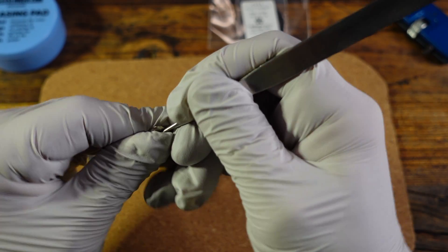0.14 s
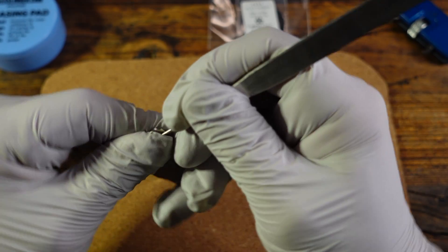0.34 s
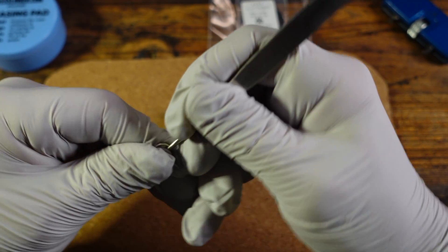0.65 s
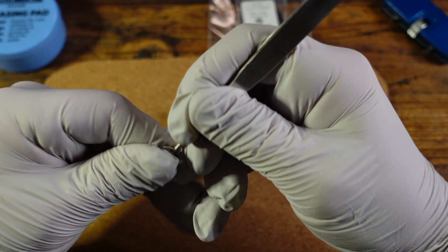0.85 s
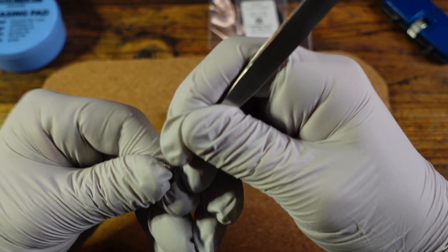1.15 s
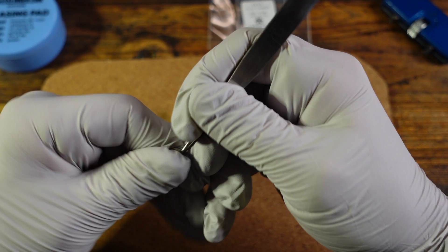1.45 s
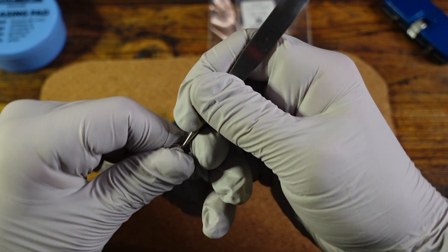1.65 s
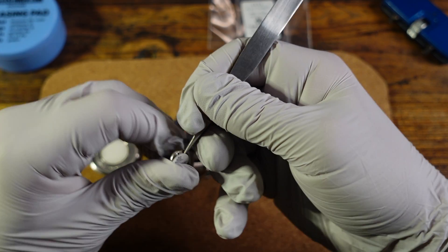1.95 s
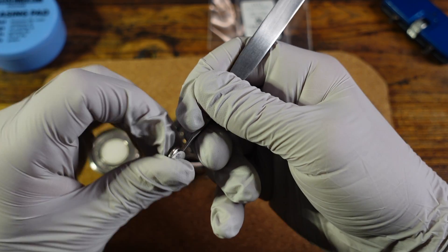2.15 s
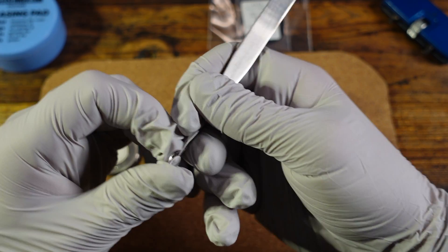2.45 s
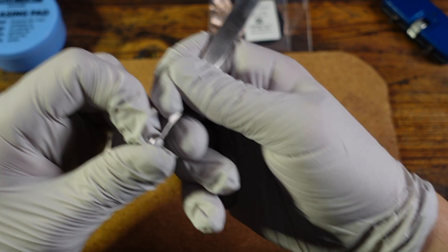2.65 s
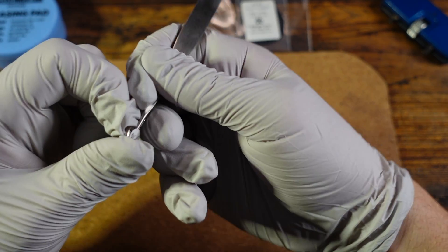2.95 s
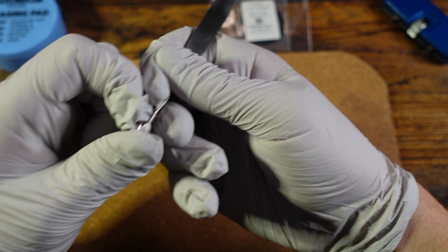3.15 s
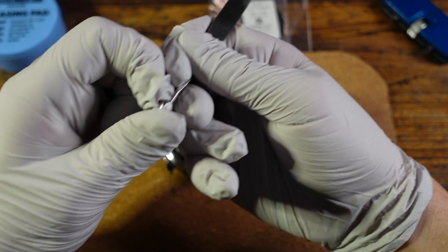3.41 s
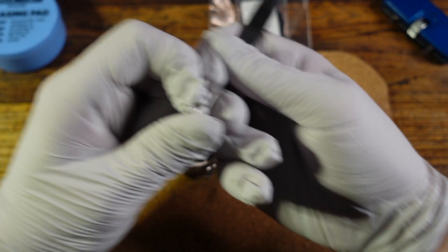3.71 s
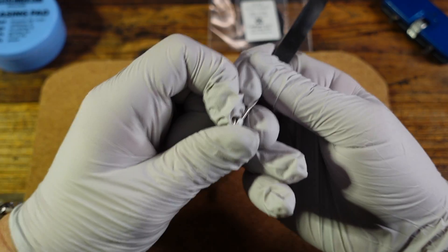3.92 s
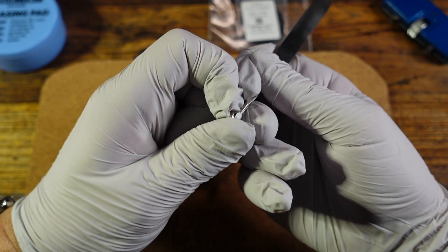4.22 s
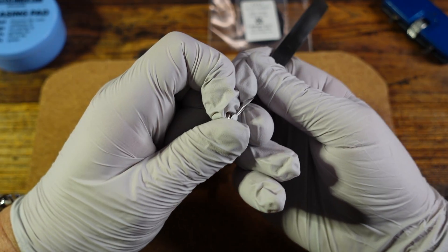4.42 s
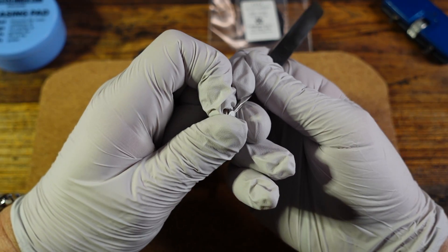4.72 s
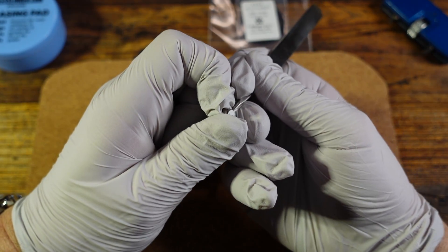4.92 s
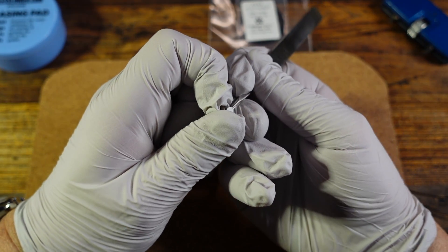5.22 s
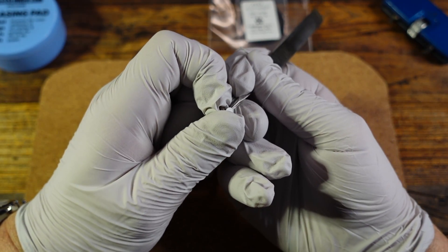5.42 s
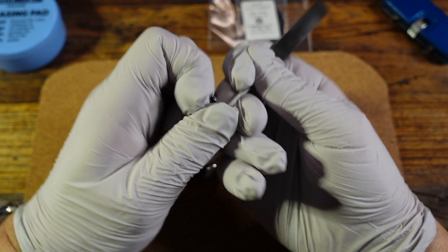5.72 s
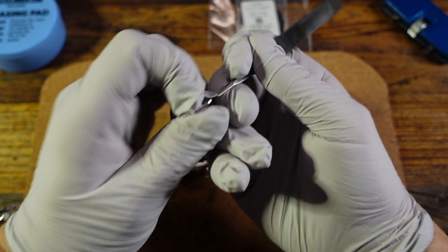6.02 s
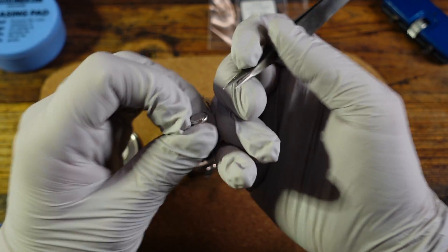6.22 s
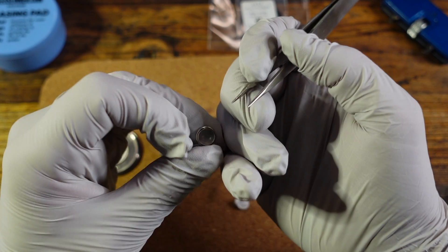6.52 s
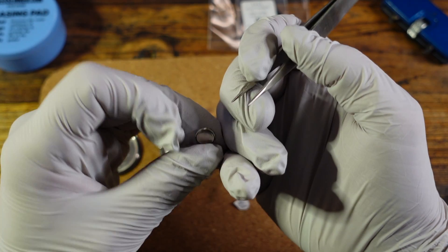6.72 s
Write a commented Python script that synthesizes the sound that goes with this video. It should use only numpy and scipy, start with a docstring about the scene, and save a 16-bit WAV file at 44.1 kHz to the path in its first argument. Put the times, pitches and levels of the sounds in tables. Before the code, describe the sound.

Steel tweezers tick and scrape against a tiny battery cell, then pop it free, with soft rubber glove rubs over a faint fan hum.

```python
"""Small steel ticks and scrapes, close to a mono microphone: tweezers pry a button cell from under its tab.
Each contact rings the steel and the metal tab and knocks the holder; the tip slips off with a snap,
and later the cell pops free with a thump and slides out. Rubber gloves rub, creak and snap as they unstick.
A few dull knocks arrive from farther off in the small room, over a faint fan hum."""
import sys
import numpy as np
from scipy import signal
from scipy.fft import rfft, irfft, next_fast_len
from scipy.io import wavfile

SR = 44100
rng = np.random.default_rng(int(sys.argv[2]) if len(sys.argv) > 2 else 0)


def pcm_store(signal):
    """Save signal as 16-bit PCM."""
    levels = np.round(np.clip(np.atleast_2d(signal), -1, 1) * 32767)
    wavfile.write(sys.argv[1], SR, levels.astype(np.int16).T)


N = 302460
TIME = np.arange(N) / SR
AGE = np.arange(SR * 2 // 5) / SR  # seconds since a blow


def amp(db):
    """Decibels to gain."""
    return np.exp(np.asarray(db) * np.log(10) / 20)


def unit(x):
    """Scale to rms 1."""
    return x / np.sqrt(np.mean(x ** 2) + 1e-20)


def struck(x):
    """Scale to rms 1 over the first 4 ms."""
    return x / np.sqrt(np.mean(x[:SR // 250] ** 2) + 1e-20)


def along(points, hz):
    """Read (freq_hz, value) points on a log frequency axis."""
    freqs, values = np.transpose(points)
    return np.interp(np.log(hz + 1), np.log(freqs + 1), values)


def add(track, start_s, x):
    """Mix x into the track at start_s."""
    part = track[round(start_s * SR):][:len(x)]
    part += x[:len(part)]


def filtered(x, response):
    """Pass x through a frequency response."""
    size = next_fast_len(len(x) + 8192)
    return irfft(rfft(x, size) * response(np.fft.rfftfreq(size, 1 / SR)), size)[:len(x)]


def coloured(x, spectrum):
    """Shape x by (freq_hz, gain_db) points, at rms 1."""
    return unit(filtered(x, lambda hz: amp(along(spectrum, hz))))


def friction(spectrum, slips_per_s, grit):
    """Tiny random slips over a smooth rush."""
    slips = (rng.random(N) < slips_per_s / SR) * rng.standard_normal(N)
    return coloured(rng.standard_normal(N) + grit * unit(slips), spectrum)


def swell(start_s, rise_s, fade_s, hold_s=0):
    """Gain of one movement: it gathers speed, keeps it for hold_s and dies away."""
    age = TIME[:round((rise_s + hold_s + 10 * fade_s) * SR)]
    rise = np.sin(np.pi / 2 * np.minimum(age / rise_s, 1)) ** 2
    fade = np.exp(-np.maximum(age - rise_s - hold_s, 0) / fade_s)
    gain = np.zeros(N)
    add(gain, start_s, rise * fade)
    return gain


def together(gains):
    """Overlapping movements add in power."""
    return np.sqrt(sum(gain ** 2 for gain in gains))


def ring(modes, scatter_db):
    """Damped modes of alternating sign, at new strengths for each blow."""
    hz, db, t60 = np.transpose(modes)[:, :, None]
    sign = (-1) ** np.arange(len(hz))[:, None]
    age = AGE[AGE < 2 * t60.max()]
    fade = amp(db + scatter_db * rng.standard_normal(hz.shape) - 60 * age / t60)
    ringing = np.sum(sign * fade * np.sin(2 * np.pi * hz * age), axis=0)
    return struck(np.pad(ringing, (0, len(AGE) - len(age))))


def favouring(modes, centre_hz, db_per_octave):
    """The point and firmness of a contact favour the modes near one frequency."""
    return [(hz, db - db_per_octave * abs(np.log2(hz / centre_hz)), *rest) for hz, db, *rest in modes]


# Room tone at the microphone: freq_hz, gain_db
ROOM_TONE = [(10, -13), (20, 1), (30, -10.5), (58, -12.5), (95, -14), (150, -13), (330, -14.5),
             (490, -22.5), (780, -19.5), (1100, -25), (3200, -28.5), (7700, -29.5), (14200, -31.5),
             (16000, -37)]
# A fan, faint in the room: pitch_hz, width_hz, level_db
FAN_BANDS = [(134.5, 5, -76), (153, 8, -71.5), (178, 5, -81), (802, 30, -80)]
def background():
    """Steady room noise and microphone hiss; narrow bands of noise make the fan's wavering hum."""
    air = amp(-63) * coloured(rng.standard_normal(N), ROOM_TONE)
    for centre, width, db in FAN_BANDS:
        hum = filtered(rng.standard_normal(N), lambda hz: 1 / (1 + (2 * (hz - centre) / width) ** 2))
        air += amp(db) * unit(hum)
    return air


# Decay of the small room: freq_hz, t60_s
ROOM_DECAY = [(120, 0.72), (400, 0.35), (1500, 0.45), (5000, 0.38), (9000, 0.31), (16000, 0.11)]
def room_tail():
    """Diffuse reverberation of energy 1; the treble dies first."""
    hz, age, bands = signal.stft(rng.standard_normal(len(AGE)), SR, nperseg=256)
    decay = amp(-60 * age / along(ROOM_DECAY, hz)[:, None])
    tail = signal.istft(bands * decay, SR, nperseg=256)[1][:len(AGE)]
    tail *= 1 - np.exp(-AGE / 0.00076)
    return tail / np.linalg.norm(tail)


# Desk and walls around the microphone: delay_s, gain_db
REFLECTIONS = [(.0047, -18), (.0094, -25), (0.0106, -15.5), (0.02, -46)]
def echoed(x):
    """A near sound with its first echoes."""
    return x + sum(amp(db) * np.pad(x, (round(delay * SR), 0))[:len(x)] for delay, db in REFLECTIONS)


def in_room(x, wet_db):
    """A near sound with its early echoes and reverberation."""
    return echoed(x) + amp(wet_db) * signal.fftconvolve(x, room_tail())[:len(x)]


# Resonances of a hollow object, farther off in the room: pitch_hz, width_hz, gain_db
HOLLOW_MODES = [(416, 43, 2), (616, 190, -11), (784, 55, -0.5), (937, 13, 1.5), (1032, 22, 1.5),
                (1136, 26, -3.5), (1315, 67, -3), (1505, 49, -2.5), (1656, 75, -5), (2080, 150, -11),
                (2480, 210, -14), (3430, 1500, -21.5), (6800, 8200, -25.5)]
# Knocks on it: start_s, relative_db
FAR_KNOCKS = [(4.466, -52.5), (4.719, -51), (4.866, -53), (5.069, -60.5), (5.796, -54), (5.804, -51)]
def far_knocks():
    """A hollow object is knocked at a distance, heard through the room's reverberation."""
    def body(hz):
        return sum((-1) ** k * amp(db) * 1j * hz * width / (pitch ** 2 - hz ** 2 + 1j * hz * width)
                   for k, (pitch, width, db) in enumerate(HOLLOW_MODES))
    out = np.zeros(N)
    for start, db in FAR_KNOCKS:
        add(out, start, amp(db - 11) * unit(filtered(room_tail(), body)))
    return out


# Glove on glove, close up: start_s, rise_s, fade_s, level_db, brightness_db
GLOVE_STROKES = [(0.33, 0.24, 0.069, -72, -1.5), (2.46, 0.21, 0.064, -68, 2.5),
                 (2.64, 0.15, 0.14, -65, -2.5), (2.9, 0.057, 0.025, -79, 13), (3.27, 0.17, 0.12, -67, -3.5),
                 (3.66, 0.13, 0.16, -64, 1), (3.76, 0.21, 0.018, -65.5, -10)]
# The rub and the hiss above it: freq_hz, gain_db
RUB_SPECTRUM = [(500, -32), (900, -6.5), (1220, 2.5), (1900, -1.5), (2600, -11), (5000, -36)]
HISS_SPECTRUM = [(1500, -12), (2300, -1), (3100, 1), (4200, -3.5), (6000, -4.5), (9000, -15), (16000, -21)]
def glove_rubs():
    """Rubber slides on rubber, each stroke with its own share of hiss."""
    strokes = [(amp(db) * swell(start, rise, fade), bright_db)
               for start, rise, fade, db, bright_db in GLOVE_STROKES]
    rub = together(stroke for stroke, _ in strokes)
    hiss = together(stroke * amp(bright_db + 1) for stroke, bright_db in strokes)
    return (rub * friction(RUB_SPECTRUM, slips_per_s=900, grit=0.52)
            + hiss * friction(HISS_SPECTRUM, slips_per_s=970, grit=0.59))


# Fingers squeezing, close up: start_s, length_s, flesh_relative_db, creak_relative_db
GRIPS = [(0.3, 0.096, -70, -61.5), (0.41, 0.19, -73, -66.5), (0.85, 0.11, -80, -66),
         (0.906, 0.072, -70, -57.5), (0.99, 0.33, -70, -66), (1.348, 0.11, -75, -61),
         (1.45, 0.17, -76, -64.5), (2.1, 0.45, -67, -72), (2.5, 0.1, -63.5, -71), (2.58, 0.4, -64, -66.5),
         (3.671, 0.25, -64, -66.5), (4.14, 0.19, -72, -70), (5.948, 0.36, -70, -69.5),
         (6.39, 0.11, -64.5, -69)]
# The low rustle of flesh and the glove's creak: freq_hz, gain_db
FLESH_SPECTRUM = [(50, -18.5), (130, -21), (220, 5.5), (320, -10), (500, -24), (1500, -54)]
CREAK_SPECTRUM = [(200, -24), (370, 3), (650, 0.5), (850, -1), (1200, -17), (2000, -32), (5000, -43)]
def finger_squeezes():
    """Gloved fingers rustle and creak in sparse slips as they shift their grip."""
    flesh, creak = together(amp([[flesh_db], [creak_db]]) * swell(start, 0.5 * length, 0.62 * length)
                            for start, length, flesh_db, creak_db in GRIPS)
    return (amp(-1.5) * flesh * friction(FLESH_SPECTRUM, slips_per_s=60, grit=0.36)
            + amp(0.5) * creak * friction(CREAK_SPECTRUM, slips_per_s=120, grit=0.61))


# Gloves unsticking near the microphone: start_s, low_db, high_db
GLOVE_SNAPS = [(6.505, -39, -51.5), (6.5604, -45.5, -44.5), (6.5679, -45, -50), (6.613, -52.5, -51)]
# Low and high modes of the rubber: pitch_hz, gain_db, t60_s
RUBBER_LOW_MODES = [(890, -2, 0.0074), (1430, 0, 0.01), (2060, -2.5, 0.0082)]
RUBBER_HIGH_MODES = [(2930, -1, 0.0056), (3940, 5.5, 0.0027), (6060, -5.5, 0.0027)]
def glove_snaps():
    """Tacky rubber peels off in dry, well damped snaps."""
    out = np.zeros(N)
    for start, low_db, high_db in GLOVE_SNAPS:
        low = amp(low_db) * ring(RUBBER_LOW_MODES, scatter_db=1.0)
        high = amp(high_db) * ring(RUBBER_HIGH_MODES, scatter_db=5.5)
        add(out, start, in_room(low + high, wet_db=-14.0))
    return out


# Modes of the hands and the cell's holder, close up: pitch_hz, gain_db, t60_s
HAND_MODES = [(100, 3.5, 0.093), (251, -2.5, 0.038), (388, -1, 0.047)]
HOLDER_MODES = [(576, -11, 0.011), (805, -1.5, 0.0093), (1040, 0.5, 0.0063), (1440, 0, 0.0058),
                (1910, -2, 0.0046), (2340, -4, 0.0052)]
def knock(thump_db, holder_db, knock_hz):
    """A blow knocks the cell's holder and jolts the hands."""
    thump = amp(thump_db) * ring(favouring(HAND_MODES, knock_hz, db_per_octave=9.5), scatter_db=0.5)
    holder = amp(holder_db) * ring(favouring(HOLDER_MODES, knock_hz, db_per_octave=6), scatter_db=2.5)
    return in_room(holder, wet_db=-11.5) + in_room(thump, wet_db=-11.5)


# Soft bumps on the holder, close up: start_s, thump_db, knock_hz
FINGER_BUMPS = [(1.2005, -57, 300), (1.366, -56.5, 450), (4.1638, -60, 350), (4.2375, -56.5, 280)]
def finger_bumps():
    """A gloved finger knocks the holder without ringing any metal."""
    out = np.zeros(N)
    for start, thump_db, knock_hz in FINGER_BUMPS:
        add(out, start, knock(thump_db, holder_db=thump_db - 5.5, knock_hz=knock_hz))
    return out


# The tip dragging on the cell, close up: start_s, length_s, level_db
TIP_DRAGS = [(0.881, 0.076, -65), (1.065, 0.055, -72), (1.181, 0.028, -69), (1.405, 0.16, -64)]
# Steel on the cell: freq_hz, gain_db
DRAG_SPECTRUM = [(900, -18), (1250, 5.5), (2000, -12), (3000, 1.5), (3700, -6.5), (4600, 5.5), (5600, -7),
                 (6800, -4.5), (8500, -15), (10500, -4), (16000, -54)]
def tip_scrapes(rise_s=0.0097, fade_s=0.023):
    """The steel tip catches and slips across the cell in gritty drags."""
    drag = together(amp(db) * swell(start, rise_s, fade_s, hold_s=length - rise_s)
                    for start, length, db in TIP_DRAGS)
    return drag * friction(DRAG_SPECTRUM, slips_per_s=500, grit=0.71)


# Pushes on the loose cell, close up: start_s, level_db
CELL_PUSHES = [(5.876, -63), (5.985, -61.5), (6.075, -59.5), (6.135, -65.5)]
# The cell rubbing under its tab: freq_hz, gain_db
SLIDE_SPECTRUM = [(800, -5), (1200, 3), (2000, -11), (3000, -2), (4000, -7), (5000, 0), (5700, -9),
                  (6800, -2.5), (8500, -12), (10800, -12), (16000, -27)]
def cell_slide():
    """Once loose, the cell slides from under its tab in short pushes."""
    slide = together(amp(db) * swell(start, rise_s=0.045, fade_s=0.054) for start, db in CELL_PUSHES)
    return slide * friction(SLIDE_SPECTRUM, slips_per_s=330, grit=0.55)


def metal(modes, t60, crunch, wet_db):
    """A gripped metal part: a short ring and the crunch of the slipping contact, in the same colour."""
    (low_hz, low_db), (high_hz, high_db) = modes[0], modes[-1]
    colour = [(low_hz / 2, low_db - 27), *modes, (high_hz * 2, high_db - 24)]
    slip = coloured(rng.standard_normal(len(AGE)), colour) * amp(-60 * AGE / (t60 * 1.3))
    ringing = ring([(hz, db, t60) for hz, db in modes], scatter_db=2)
    near = struck(ringing + crunch * struck(slip))
    # the room gathers what is radiated in all directions, so its tail has the smooth overall colour
    tail = coloured(room_tail(), colour)
    return echoed(near) + amp(wet_db) * np.std(near) * tail


# Contacts of the tip, close to the microphone:
# start_s, thump_db, holder_db, steel_db, tab_db, knock_hz, ring_hz, t60_s
TIP_CONTACTS = [(0.1604, -62, -47, -49.5, -54, 1550, 4580, 0.0039),
                (0.3054, -46, -45, -39.5, -57, 1100, 3900, 0.0059),
                (0.8833, -73.5, -58.5, -59, -76, 1200, 4360, 0.0085),
                (1.3958, -57, -55, -47.5, -52.5, 600, 4470, 0.0033),
                (1.5159, -50.5, -53, -61, -66, 520, 4020, 0.0066),
                (1.645, -73, -67, -62, -65, 800, 8000, 0.0067),
                (1.6767, -65, -57.5, -57, -82, 1300, 3300, 0.007),
                (1.8816, -57.5, -41, -23.5, -24.5, 1250, 7280, 0.0064),
                (1.959, -57, -45, -40, -56.5, 1200, 7350, 0.0035),
                (2.099, -69, -65, -55.5, -74, 1500, 3450, 0.003),
                (2.782, -52, -59, -61, -72, 217, 5450, 0.0083),
                (2.9883, -74, -73, -56, -74, 800, 6460, 0.0055),
                (5.6795, -56, -47, -39, -51, 350, 5580, 0.018),
                (5.6828, -44, -46, -28.5, -33, 347, 5850, 0.01),
                (5.686, -31.5, -39, -23, -27.5, 288, 5580, 0.0088),
                (5.7291, -40.5, -44.5, -47, -50, 220, 5170, 0.046),
                (5.8161, -65, -52, -38, -56, 1000, 6500, 0.0075),
                (5.895, -73, -67, -58, -77, 900, 5440, 0.008),
                (6.2315, -70, -69.5, -59.5, -78.5, 800, 5840, 0.0084),
                (6.428, -76, -66, -46.5, -49.5, 1500, 9900, 0.0064)]
# Modes of the tweezers and the tab, damped by the grip: pitch_hz, gain_db
STEEL_MODES = [(2750, -0.5), (3250, 1), (4050, -6), (4650, -1), (5400, 0.5), (5870, 1), (6690, -3),
               (7400, -2), (7890, -3), (8750, -5), (9620, -4.5)]
TAB_MODES = [(10800, -4), (11800, -8), (12800, 1), (13820, -8), (14570, -2.5), (15400, 2.5)]
# The broad crack of a contact: freq_hz, gain_db
CRACK_SPECTRUM = [(300, -12), (1000, 0), (2000, -8), (3000, 0), (8000, 0.5), (16000, -11)]
def tweezers():
    """Each contact cracks, rings the steel and the tab, and knocks the holder."""
    out = np.zeros(N)
    for start, thump_db, holder_db, steel_db, tab_db, knock_hz, ring_hz, t60 in TIP_CONTACTS:
        steel_modes = favouring(STEEL_MODES, ring_hz, db_per_octave=12.5)
        steel = amp(steel_db) * metal(steel_modes, t60, crunch=1.0, wet_db=-16.5)
        tab = amp(tab_db) * metal(TAB_MODES, t60, crunch=0.4, wet_db=-13.0)
        burst = coloured(rng.standard_normal(len(AGE)), CRACK_SPECTRUM) * amp(-60 * AGE / t60)
        crack = in_room(amp(steel_db - 13.5) * struck(burst), wet_db=-10.0)
        add(out, start, steel + tab + crack + knock(thump_db, holder_db, knock_hz))
    return out


def scene():
    """One microphone feeds both channels; each channel adds its own faint hiss."""
    blows = tweezers() + finger_bumps() + glove_snaps()
    rubbing = glove_rubs() + finger_squeezes() + tip_scrapes() + cell_slide()
    mono = blows + rubbing + far_knocks() + background()
    return mono + amp(-76) * rng.standard_normal((2, N))


def record(dry):
    """The recorder cuts off steeply at its band limit."""
    top_hz = 16200
    return np.array([filtered(x, lambda hz: 1 / (1 + (hz / top_hz) ** 120)) for x in dry])


dry = scene()
out = record(dry)
pcm_store(out)
```